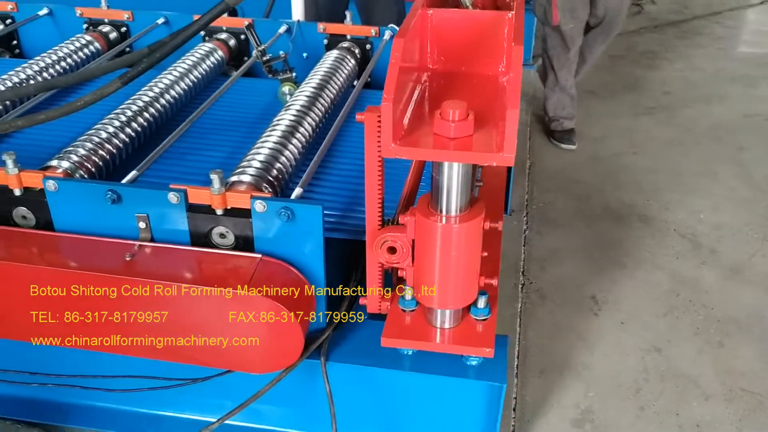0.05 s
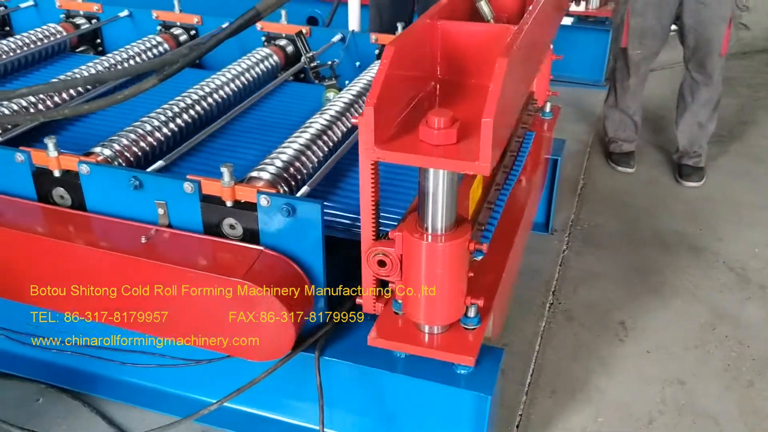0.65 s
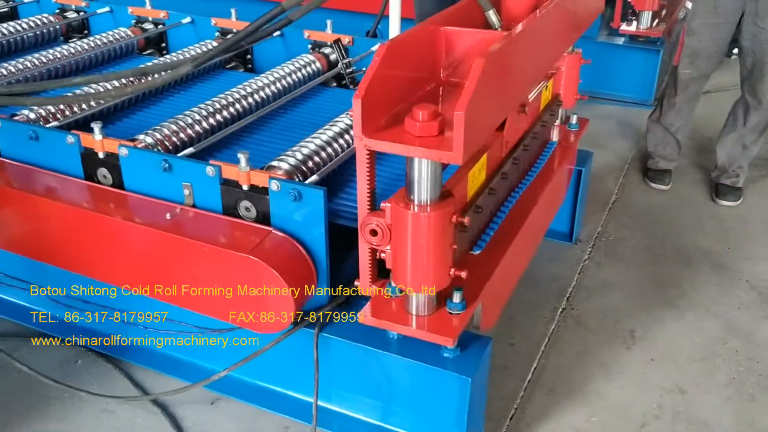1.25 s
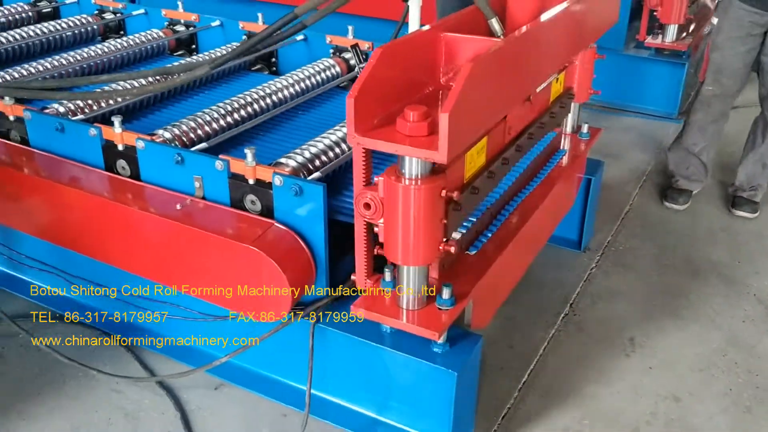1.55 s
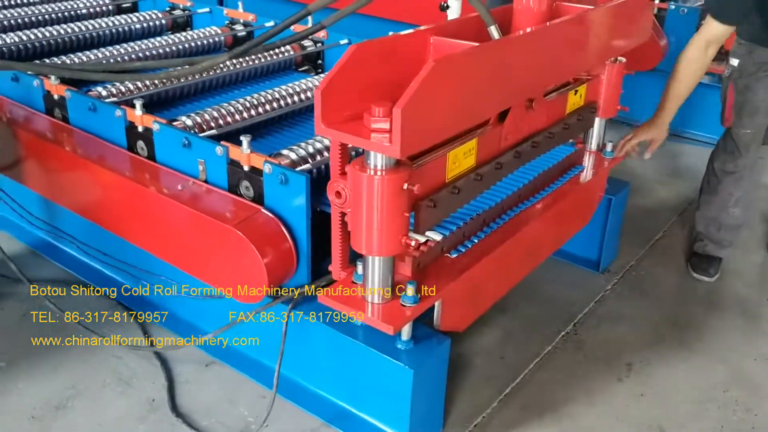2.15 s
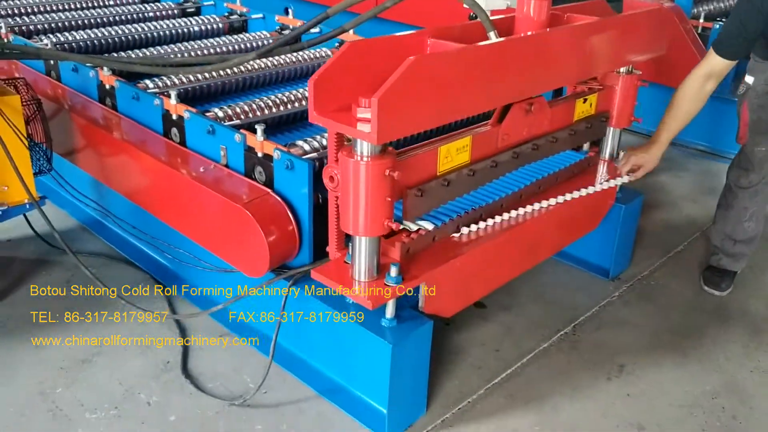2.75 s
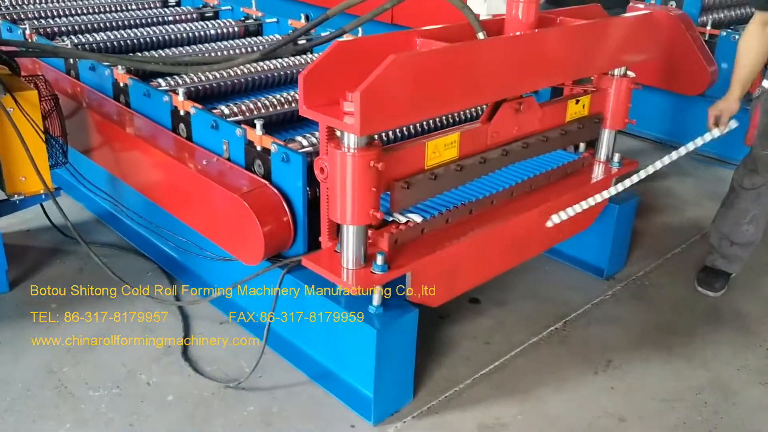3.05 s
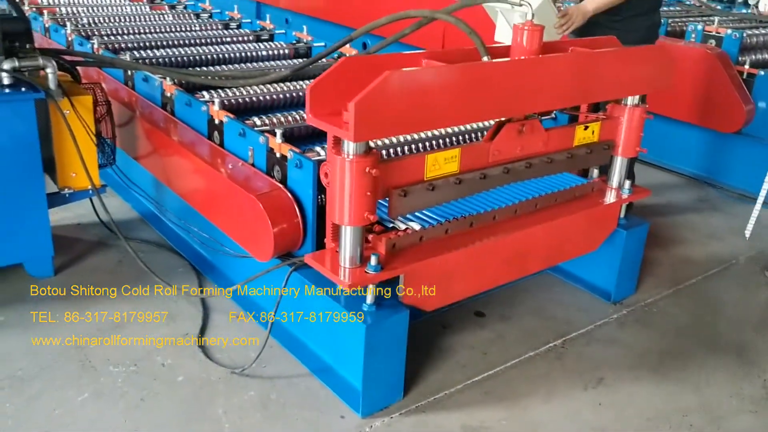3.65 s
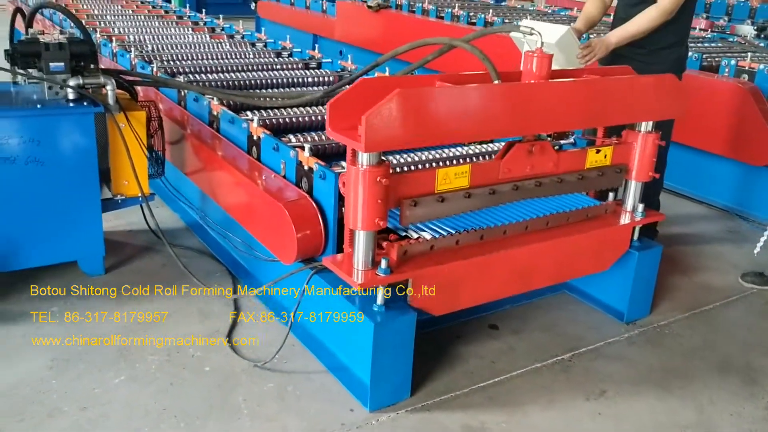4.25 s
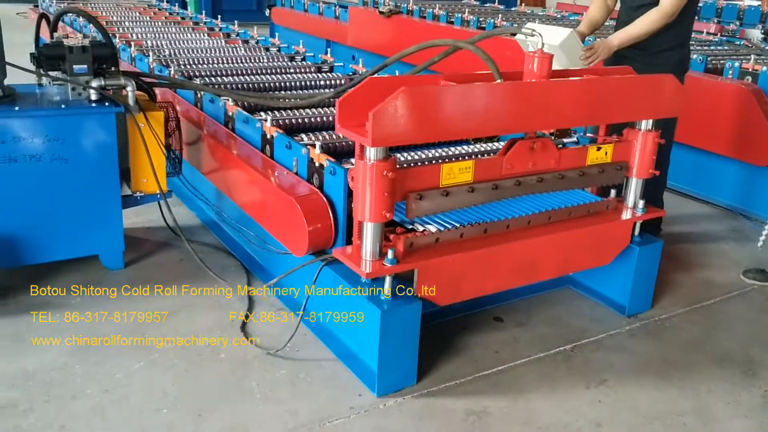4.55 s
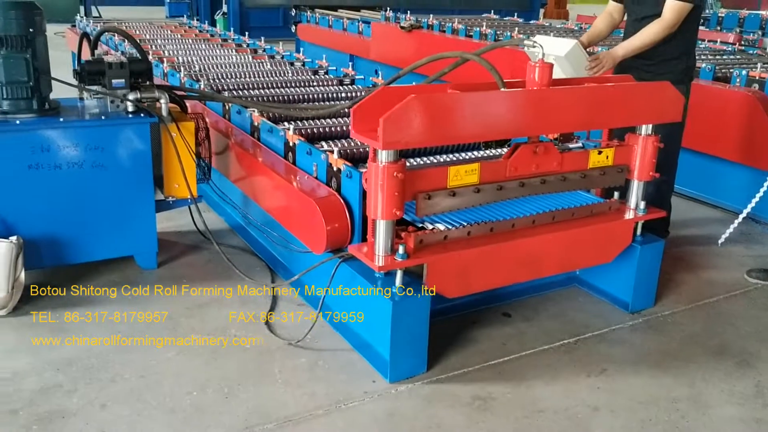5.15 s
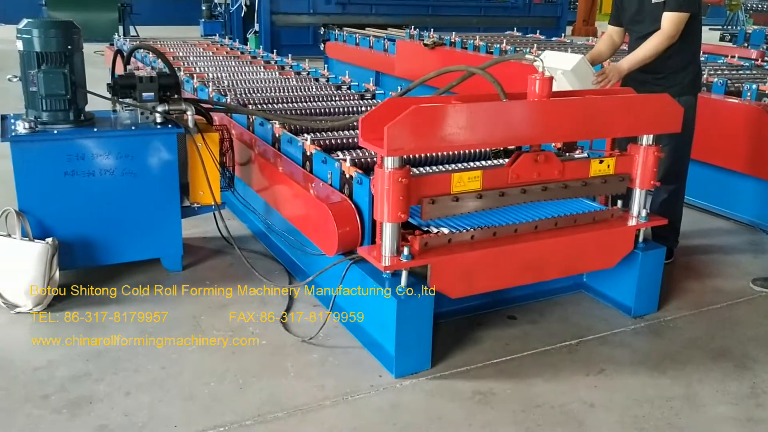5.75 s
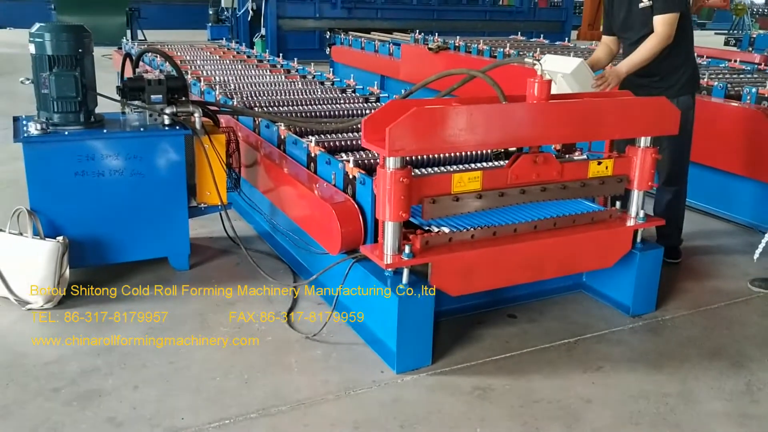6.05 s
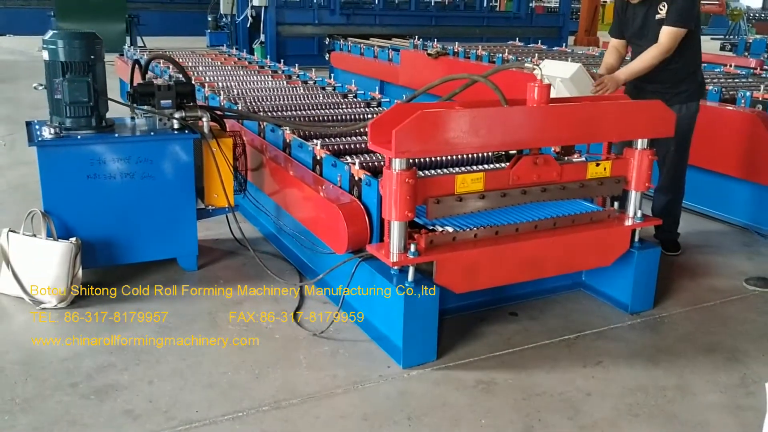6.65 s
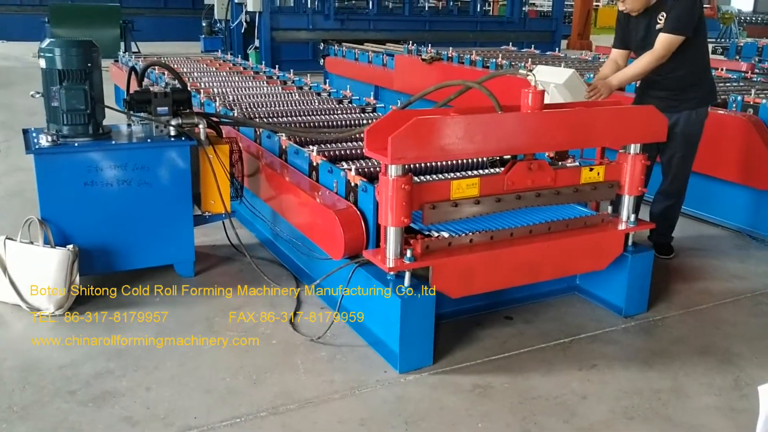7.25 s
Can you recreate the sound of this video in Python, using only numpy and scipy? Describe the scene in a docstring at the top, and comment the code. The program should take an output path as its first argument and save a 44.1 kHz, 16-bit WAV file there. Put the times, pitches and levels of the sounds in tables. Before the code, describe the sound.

From the start, steel sheet rattles and jingles through the rollers of a nearby machine, with dull bumps and an uneven low rumble. At about 1.3 seconds a shear comes down with a heavy thud and a short crunch. Loud, ringing clanks follow at about 1.9 and 2.3 seconds, while the metal panels roar. Around 2.5 seconds a low, wavering motor hum sets in with a brief sinking groan, and the rattle gradually quiets. Light clinks come just after 3 seconds, and scattered knocks between 3.6 and 4.5 seconds and again after 6. The metal sounds drift slightly left. Near 6.8 seconds the rattle builds again with more knocks, and the hum and rumble grow until the end at about 7.4 seconds. A steady factory wash and short echo surround everything. The overall tone is muffled, with a thin, high sizzle on top.

```python
"""Roll forming machine in a factory hall.

Ribbed steel sheet rattles through the rollers and shakes the panels and frame. The shear goes down and up
with clanks and a roar of the panels. A motor hum sets in while the feed rests; then the sheet moves again.
The sound is cut to a narrow band and sampled unsmoothed, which mirrors it as a thin sizzle near 15 kHz."""
import sys
import numpy as np
from scipy import signal
from scipy.fft import rfft, irfft, next_fast_len
from scipy.io import wavfile
from scipy.ndimage import uniform_filter1d, map_coordinates

SR = 44100
rng = np.random.default_rng(int(sys.argv[2]) if len(sys.argv) > 2 else 0)


def dump_mix(stems):
    """Bounce the given channels to the path in sys.argv[1] as a 16-bit WAV at rate SR."""
    frames = np.atleast_2d(stems).T  # one column per channel
    limited = np.clip(frames, -1, 1)  # hard clip at full scale
    pcm = np.round(limited * 32767).astype(np.int16)
    wavfile.write(sys.argv[1], SR, pcm)


N = 326013

# sheet rattle, also driving panels and frame: time_s, level_db
FEED_LEVEL = [(0, -31.5), (.17, -31), (.33, -28), (.75, -28.5), (.9, -31.5), (.94, -30.5), (1.25, -33),
              (1.45, -30), (1.85, -33), (1.91, -34), (1.96, -36.5), (2.3, -32), (2.95, -38.5), (3.7, -40.5),
              (4.15, -42.5), (5, -43.5), (5.1, -40.5), (6.65, -41.5), (6.77, -35), (6.83, -31), (7.06, -33),
              (7.39, -29.5)]


def rollers():
    """The sheet chatters and jingles on the rollers and shakes the panels, which roar under load."""
    # radiated spectra: freq_hz, density_db
    sheet_spectrum = [(200, -23), (450, -11.5), (700, -6.5), (1000, -15), (1200, -0.5), (1450, -0.5),
                      (1720, 4.5), (2080, 3.5), (2370, 4.5), (2600, -2.5)]
    panel_spectrum = [(150, -24), (300, -6.5), (400, -5), (520, -2), (690, 0.5), (770, -0.5), (840, -2),
                      (950, -3), (1350, -4), (1800, -13), (2500, -16)]
    # panel loads (shear down, shear up, a jolt, feed pulling again): start_s, length_s, level_db
    loads = [(1.312, .33, -29.5), (1.936, 0.54, -27), (4.386, 0.046, -38), (6.82, 0.077, -32.5),
             (7.242, .13, -32.5)]
    feed_db = curves(FEED_LEVEL)[0]
    chatter = amp(feed_db + 3.5 + 0.61 * wobble(25))
    sheet = chatter * radiate(contacts(rate_hz=250, spread_db=0.5, rub=2.7), sheet_spectrum)
    ticks = amp(feed_db - 2) * jingle()
    load_power = swells(loads, attack_s=0.016, fall_db_per_s=18.5)
    roar = shaken(load_power, base_db=-32, db_per_feed_db=0.77) * amp(0.81 * wobble(18))
    panels = roar * radiate(contacts(rate_hz=300, spread_db=5.5, rub=1.8), panel_spectrum)
    return rippled(sheet + panels) + ticks


def jingle(rate_hz=260, low_hz=1148.6, high_hz=2511, spread_db=7, mean_t60_s=0.12):
    """Chain links and sheet edges tick at random, each ringing briefly at its own pitch. Rms 1."""
    count = int(rate_hz * N / SR)
    when, pitch, size, life, right_phase = rng.random((count, 5)).T[:, :, None]
    t = np.arange(SR // 16) / SR
    hz = low_hz + pitch * (high_hz - low_hz)
    fade = amp(spread_db * size ** 2 - 60 * t / (mean_t60_s * (0.5 + life)))
    index = (when * N).astype(int) + np.arange(len(t))
    ticks = [fade * np.sin(2 * np.pi * (hz * t + phase)) for phase in (0, right_phase)]
    return unit(np.array([np.bincount(index.ravel(), side.ravel(), N)[:N] for side in ticks]))


def shear():
    """The blade crunches through the ribs of the sheet in a run of dull, uneven snaps."""
    # blade stroke: start_s, length_s, level_db
    stroke = [(1.326, 0.38, -32)]
    # sheet being cut: freq_hz, density_db
    spectrum = [(180, -22.5), (300, 4.5), (450, 4.5), (750, -2), (1050, -0.5), (1400, -20.5), (2500, -46)]
    bite = np.sqrt(swells(stroke, attack_s=0.022, fall_db_per_s=72.5)) * amp(0.67 * wobble(45))
    return bite * radiate(contacts(rate_hz=130, spread_db=1.5, rub=1.4), spectrum)


def knocks(recoil_cycles=3.6, clink_hz=2260, rolloff_db_per_octave=21.5):
    """Each blow cracks, thuds in the frame, clangs in the plates and clinks at the contact."""
    # blows on steel, relative levels: start_s, thud_db, thud_hz, clang_db, clang_hz, clink_db, t60_s
    blows = [(1.311, -10, 83.6, -18, 278, -42.5, 0.1), (1.335, -16, 99, -21.5, 472, -25.5, .3),
             (1.355, -24, 100.2, -16.5, 950, -32.5, .14), (1.369, -17, 89.8, -21, 555, -30, 0.29),
             (1.935, -12.5, 129, -8, 1366, -19, .07), (1.962, -30.5, 161.2, -12, 880, -17, 0.14),
             (1.996, -41.5, 165.3, -17, 1494, -29.5, 0.11), (2.023, -43.5, 163, -17, 1412, -26, .06),
             (2.279, -16, 286, -17.5, 1202, -33.5, 0.26), (2.282, -30.5, 199, -9.5, 1367, -27.5, 0.099),
             (2.311, -41, 200, -19.5, 1293, -31.5, .3), (3.13, -55.5, 155, -40.5, 1903, -24.5, 0.08),
             (3.141, -53, 161, -23.5, 1414, -20.5, 0.064), (3.154, -49, 158.5, -26, 1843, -26.5, 0.22),
             (3.19, -53.5, 162, -29.5, 1850, -32.5, 0.21), (3.236, -50.5, 160.6, -28, 1760, -37, .12),
             (3.64, -37, 79.5, -30.5, 998, -32, 0.56), (4.073, -25.5, 78.5, -27, 900, -36, 0.025),
             (4.353, -23, 81.2, -27, 1240, -40, .08), (4.371, -30.5, 383.5, -39, 1880, -25.5, .05),
             (4.374, -31, 385, -36.5, 1867, -15.5, 0.048), (4.391, -39.5, 79, -28, 988, -41, .2),
             (4.443, -23, 110.7, -30, 802, -42.5, .2), (6.043, -24, 223.5, -36.5, 893, -29, .23),
             (6.42, -44, 161, -25.5, 1193, -38.5, 0.22), (6.802, -38.5, 81, -26.5, 902, -28.5, 0.38),
             (6.873, -32.5, 79.4, -24, 765, -36, 0.17)]
    # modes of the struck steel: freq_hz, gain_db, t60_s
    modes = [(675, -7.5, .15), (831, 5, .32), (1200, -4.5, 0.32), (1282, -6, .6), (1550, -6, 0.28),
             (1820, -3.5, 0.34), (1852, -2.5, 0.55), (1901, 9, 0.028), (2210, -9, 0.4), (2385, 2, 0.03),
             (2511, 10, 0.069)]
    out, t = np.zeros((2, N + SR)), np.arange(SR // 2) / SR
    near = lambda hz, centre_hz: amp(-rolloff_db_per_octave * abs(np.log2(hz / centre_hz)))
    for start_s, thud_db, thud_hz, clang_db, clang_hz, clink_db, t60_s in blows:
        recoil = -np.sin(2 * np.pi * thud_hz * t) * amp(-60 * t * thud_hz / recoil_cycles)
        shudder = burst(t, thud_hz / 2.5, thud_hz * 3, t60_s=0.14)
        thud = amp(thud_db - 7) * (0.7 * shudder + 2 * recoil)
        for channel in out:
            ring = np.zeros(len(t))
            for hz, gain_db, mode_t60_s in modes:
                force = amp(clang_db) * near(hz, clang_hz) + amp(clink_db) * near(hz, clink_hz)
                fade = amp(gain_db + rng.normal(0, 4.3) - 60 * t / mode_t60_s)
                ring += force * fade * np.sin(2 * np.pi * (hz * t + rng.random()))
            clang = amp(clang_db - 6) * burst(t, clang_hz / 1.45, clang_hz * 1.32, t60_s)
            clink = amp(clink_db - 1) * burst(t, 1900, 4400, t60_s)
            crack = amp(clang_db - 9.5) * burst(t, 900, 3900, t60_s=0.022)
            channel[round(start_s * SR):][:len(t)] += thud + crack + clang + clink + amp(-15) * ring
    return out[:, :N]


def frame():
    """The heavy frame booms in uneven surges and passes a rumble to the ground."""
    # frame shudders: start_s, length_s, boom_db, ground_db
    shudders = [(0, 0.032, -43.5, -29), (0.331, 0.12, -36, -28.5), (0.427, 0.18, -34, -34.5),
                (0.783, 0.11, -35, -39), (1.104, 0.13, -35.5, -30), (1.308, .1, -26.5, -29.5),
                (1.497, 0.25, -28.5, -31.5), (1.795, 0.088, -30, -28), (2.496, 0.3, -33, -38),
                (3.18, 0.037, -29, -43.5), (3.674, .42, -39.5, -36), (4.382, 0.18, -33.5, -36),
                (5.948, 0.14, -38.5, -34), (6.762, 0.46, -36, -30.5), (7.097, .25, -32.5, -35)]
    # radiated spectra: freq_hz, density_db
    frame_spectrum = [(40, -27), (60, 4), (85, 8), (108, 0.5), (132, 6), (165, -5.5), (205, 1), (245, 0.5),
                      (310, -5), (380, -5.5), (600, -25.5)]
    ground_spectrum = [(4, -13), (18, -5), (26, -1), (45, -3.5), (60, -6), (100, -33), (200, -55)]
    start_s, length_s, boom_db, ground_db = np.transpose(shudders)
    power = lambda db: swells(zip(start_s, length_s, db), attack_s=0.023, fall_db_per_s=130)
    surge = wobble(14)
    boom_gain = shaken(power(boom_db), base_db=-38, db_per_feed_db=0.1) * amp(0.73 * surge)
    ground_gain = shaken(power(ground_db), base_db=-39, db_per_feed_db=0.057) * amp(0.87 * surge)
    boom = boom_gain * radiate(contacts(rate_hz=90, spread_db=4, rub=1.8), frame_spectrum)
    rumble = ground_gain * radiate(rng.standard_normal((2, N)), ground_spectrum)
    return boom + rumble


def bumps(decay_cycles=4.1):
    """The sheet flexes and bumps the frame: a few low cycles, no ring of steel."""
    # dull bumps: start_s, level_db, pitch_hz
    hits = [(.336, -18.5, 35), (.449, -18.5, 111), (0.461, -18.5, 164), (.619, -21, 123.4),
            (1.108, -17.5, 76.3), (1.174, -21.5, 70.3), (1.236, -17.5, 50.3), (1.574, -20, 79.1),
            (1.635, -18.5, 69.4), (1.655, -20.5, 95), (1.699, -21, 222.5), (1.719, -22, 109),
            (1.823, -21, 65.8), (1.856, -23.5, 59.8)]
    out, t = np.zeros(N), np.arange(N) / SR
    for start_s, db, hz in hits:
        cycles = hz * np.maximum(t - start_s, 0)
        out += amp(db - 60 * cycles / decay_cycles) * np.sin(2 * np.pi * cycles)
    return out


def motor(shaft_hz=68.3, on_s=2.47, rise_s=0.13, idle_gain=0.19):
    """Shaft orders at a slightly unsteady speed; the high ones waver most, and come and go."""
    # first and fourth order with the motor fully on: time_s, level_db
    hum_level = [(2.66, -28), (2.85, -27.5), (3, -33.5), (3.3, -36.5), (3.6, -32.5), (3.95, -32.5),
                 (4.3, -38), (4.5, -33.5), (5.1, -33), (5.27, -44.5), (5.55, -35.5), (5.85, -31.5),
                 (6.45, -34), (6.8, -31), (6.94, -25.5), (7.06, -33.5), (7.13, -23.5), (7.39, -25)]
    fourth_level = [(2.7, -36.5), (3.05, -39), (3.4, -35.5), (4, -40), (4.35, -47.5), (4.95, -40.5),
                    (5.5, -39.5), (6, -36.5), (6.9, -40.5), (7.39, -39.5)]
    # faint overtones: shaft_order, level_db
    overtones = [(2, -49), (5, -63), (8, -52), (10, -51), (16, -58.5), (19, -50), (21, -59)]
    angle = 2 * np.pi * np.cumsum(shaft_hz * (1 + 0.001 * wobble(7))) / SR
    on = np.clip((np.arange(N) / SR - on_s) / rise_s, idle_gain, 1)
    hum = amp(curves(hum_level)[0] + 0.61 * wobble(4.2)) * np.sin(angle + 0.049 * wobble(51))
    fourth = amp(curves(fourth_level)[0] + 2.1 * wobble(9)) * np.sin(4 * angle + 0.7 * wobble(20))
    whine = np.zeros((2, N))
    for order, db in overtones:
        gain = amp(db + 3 * wobble(2.5))
        waver_rad = 1.15 * np.array([wobble(14), wobble(14)])
        whine += gain * np.sin(order * angle + waver_rad)
    return np.sqrt(2) * on * (hum + fourth + whine)


def groan():
    """One low tone sinks and fades as the hum sets in."""
    # falling tone: time_s, pitch_hz, level_db
    glide = [(2.55, 266, -55), (2.66, 258.2, -27.5), (2.76, 244, -38), (2.92, 240, -40), (3.05, 232.5, -72)]
    hz, db = curves(glide)
    return np.sqrt(2) * amp(db) * np.sin(2 * np.pi * np.cumsum(hz) / SR)


def factory():
    """The even wash of the hall comes from all sides."""
    # hall wash: freq_hz, density_db
    spectrum = [(100, -14.5), (165, 4.5), (220, 11), (300, 6), (370, 0.5), (460, 3), (600, -5), (750, 0.5),
                (930, -19), (1500, -4), (2500, -6)]
    likeness = [(150, 1.0), (300, 0.94), (600, 0.12), (1500, 1.0)]  # freq_hz, correlation
    return amp(-33) * rippled(radiate(rng.standard_normal((2, N)), spectrum, likeness))


def hall(x):
    """Reverberation: a noise tail that dies away in about a second."""
    # hall decay: freq_hz, t60_s
    decay = [(60, 1), (500, 0.96), (2500, 1)]
    hz, t, noise = signal.stft(rng.standard_normal((2, SR)), SR, nperseg=256)
    tail = signal.istft(noise * amp(-60 * t / along(decay, hz)[:, None]), SR, nperseg=256)[1]
    return signal.fftconvolve(x, tail / np.linalg.norm(tail[0]), axes=1)[:, :N]


def rippled(x, depth_db=2.2):
    """Reflections raise and hollow narrow bands, which drift as the listener walks."""
    bands = signal.stft(x, nperseg=2048)[2]
    field = rng.standard_normal(bands.shape)
    for _ in range(2):
        field = uniform_filter1d(uniform_filter1d(field, size=3, axis=1), size=17, axis=2)
    return signal.istft(bands * unit(amp(depth_db * unit(field))), nperseg=2048)[1][:, :N]


def contacts(rate_hz, spread_db, rub):
    """Random tiny impacts of uneven size over steady rubbing; two uncorrelated drives."""
    size = amp(spread_db * rng.uniform(-1, 1, N))
    taps = (rng.random(N) < rate_hz / SR) * size
    return unit(taps * np.sign(rng.standard_normal((2, N)))) + rub * rng.standard_normal((2, N))


def radiate(drive, spectrum, likeness=None):
    """Two drives coloured by a body and spread in stereo; mid rms 1."""
    # default likeness of left and right: freq_hz, correlation
    machine_likeness = [(100, 1), (250, 0.05), (400, -1), (550, -0.35), (700, 0.13), (1000, 0), (1400, 0.1),
                        (2400, -0.29)]

    def response(hz):
        width_rad = np.arccos(np.clip(along(likeness or machine_likeness, hz), -1, 1)) / 2
        return amp(along(spectrum, hz)) * [np.cos(width_rad), np.sin(width_rad)]

    mid, side = filtered(drive, response)
    return np.array([mid + side, mid - side]) / np.std(mid)


def shaken(extra_power, base_db, db_per_feed_db, feed_ref_db=-30):
    """Gain of a part that follows the feed and takes swells on top."""
    follow_db = db_per_feed_db * (curves(FEED_LEVEL)[0] - feed_ref_db)
    return np.sqrt(amp(base_db + follow_db) ** 2 + extra_power)


def swells(events, attack_s, fall_db_per_s):
    """Summed power of events that rise, hold and die away."""
    power, t = np.zeros(N), np.arange(N) / SR
    for start_s, length_s, db in events:
        rise = np.clip((t - start_s) / attack_s, 0, 1)
        fall_db = fall_db_per_s * np.maximum(t - start_s - length_s, 0)
        power += (rise * amp(db - fall_db)) ** 2
    return power


def burst(t, low_hz, high_hz, t60_s):
    """Band noise that starts at once and dies away."""
    band = signal.butter(2, [low_hz, high_hz], "band", fs=SR, output="sos")
    return unit(signal.sosfilt(band, rng.standard_normal(len(t)))) * amp(-60 * t / t60_s)


def wobble(rate_hz):
    """Smooth random curve with knots at rate_hz."""
    knots = rng.standard_normal(int(N * rate_hz / SR) + 4)
    return map_coordinates(knots, [np.arange(N) * rate_hz / SR])


def curves(rows):
    """One value per sample for each column after time_s."""
    time_s, *columns = np.transpose(rows)
    return [np.interp(np.arange(N) / SR, time_s, column) for column in columns]


def along(points, hz):
    """Interpolate (freq_hz, value) points on a log axis."""
    freq_hz, values = np.transpose(points)
    return np.interp(np.log(hz + 1), np.log(freq_hz + 1), values)


def filtered(x, response):
    """Apply the gain response(hz)."""
    size = next_fast_len(N + 8192)
    return irfft(rfft(x, size) * response(np.fft.rfftfreq(size, 1 / SR)), size)[..., :N]


def sides(lean_db):
    """Left and right gains for a level difference."""
    return amp(np.array([lean_db, -lean_db]) / 2)


def amp(db):
    return 10 ** (np.asarray(db) / 20)


def unit(x):
    return x / np.sqrt(np.mean(x ** 2) + 1e-20)


def scene():
    """The steel sounds shift as the listener walks round the machine; the two sides differ in colour."""
    # balance of the steel sounds: time_s, left_minus_right_db
    walk = [(0, -1), (1.2, 0), (1.5, -1), (2.4, 0), (3.2, -0.5), (4.5, -3), (6, -6), (7.39, -1)]
    # balance of the whole mix: freq_hz, left_minus_right_db
    lean = [(80, 0.5), (280, 0), (400, 0.5), (650, 2.5), (850, 6), (1200, 4.5), (1700, 4.5), (2100, 1.5),
            (2450, -11.5)]
    blows = knocks()
    steel = (rollers() + shear() + blows + amp(-3.5) * hall(blows)) * sides(curves(walk)[0])
    mix = steel + frame() + bumps() + motor() + groan() + factory()
    return filtered(mix, lambda hz: sides(along(lean, hz)))


def record(dry, ceiling=0.5, top_hz=15770):
    """Round the peaks; keep a narrow band on every third sample, which mirrors it around SR / 3."""
    # low-pass response: freq_hz, gain_db
    passband = [(2495, 0), (2565, -15), (2780, -25), (2900, -56), (5600, -62), (5900, -140)]
    rounded = dry / (1 + (dry / ceiling) ** 6) ** (1 / 6)
    left, right = filtered(rounded, lambda hz: amp(along(passband, hz)))
    slot = np.arange(N) % 3
    # left also carries the mid signal, one sample before its own
    pulses = np.array([(slot == 1) * (left + right) / 2 + (slot == 2) * left, (slot == 1) * right])
    return filtered(2 * pulses, lambda hz: hz < top_hz)


dry = scene()
out = record(dry)
dump_mix(out)
```